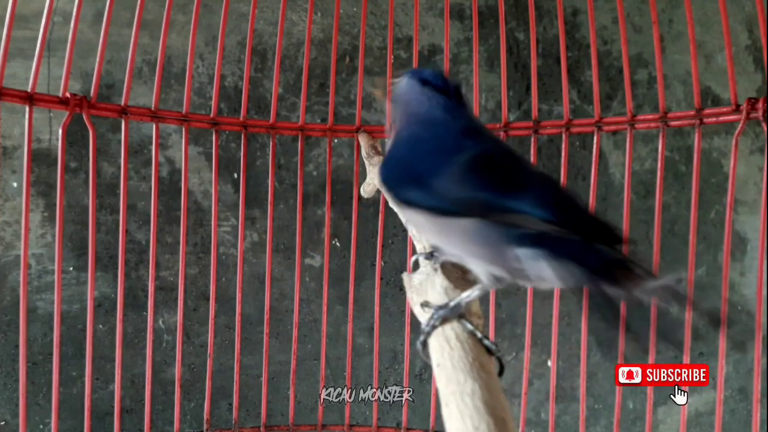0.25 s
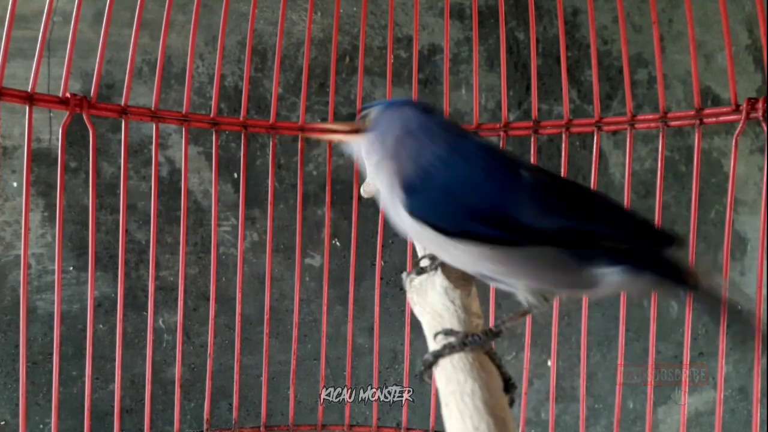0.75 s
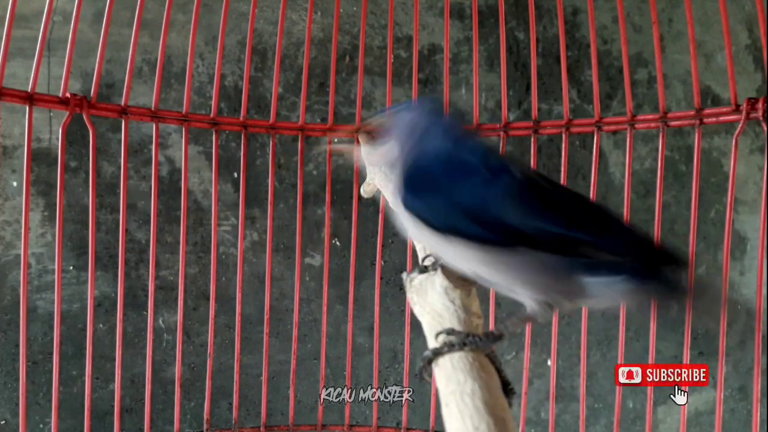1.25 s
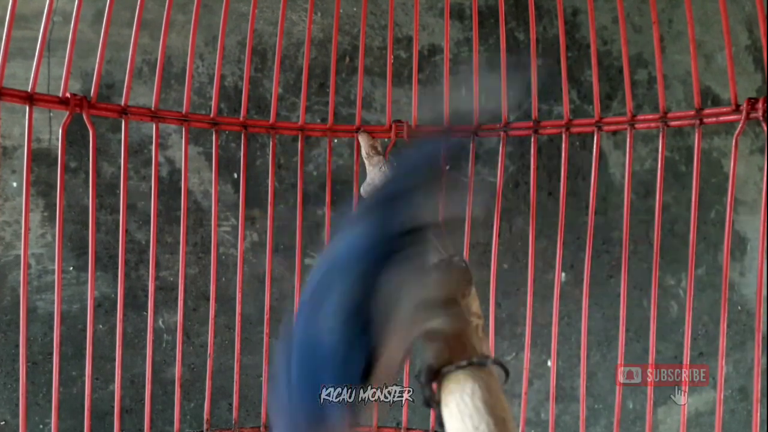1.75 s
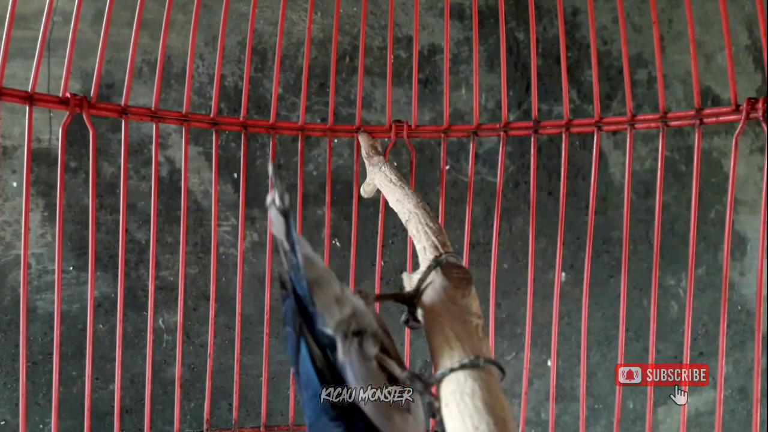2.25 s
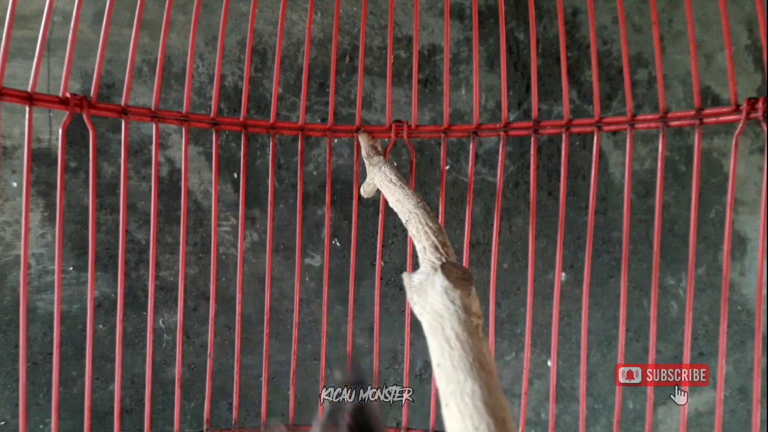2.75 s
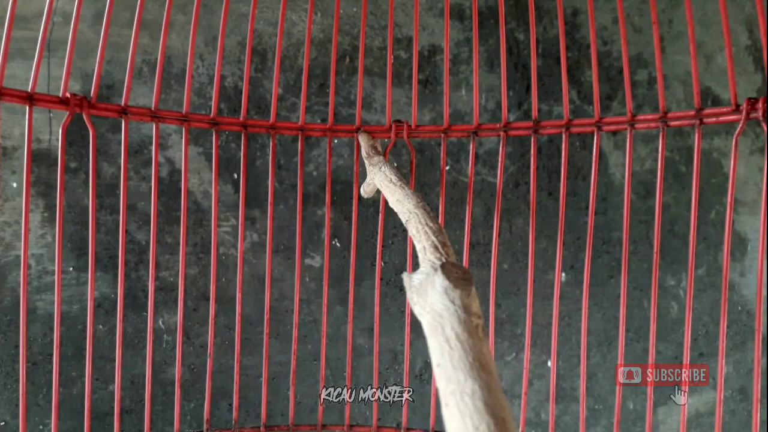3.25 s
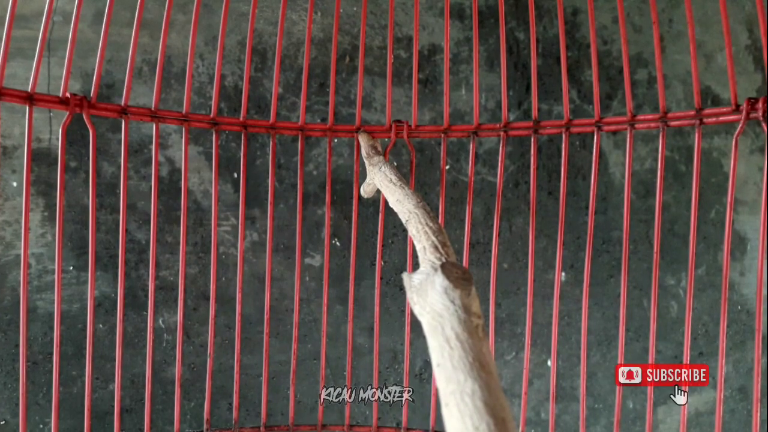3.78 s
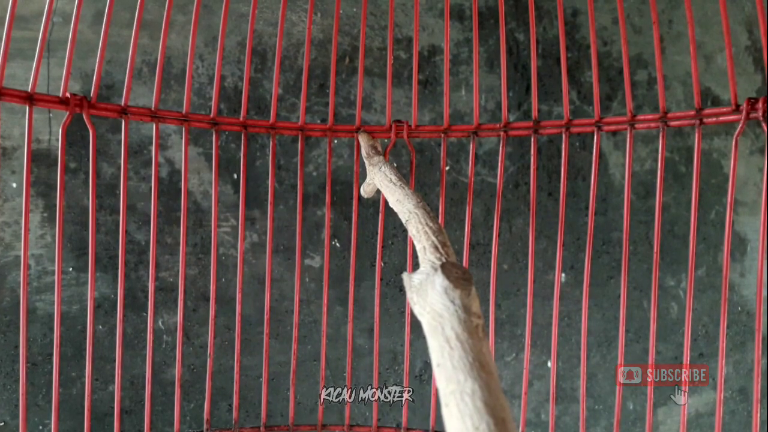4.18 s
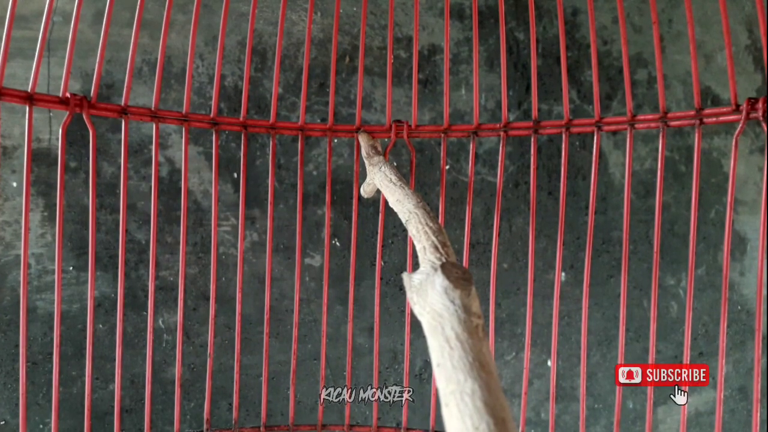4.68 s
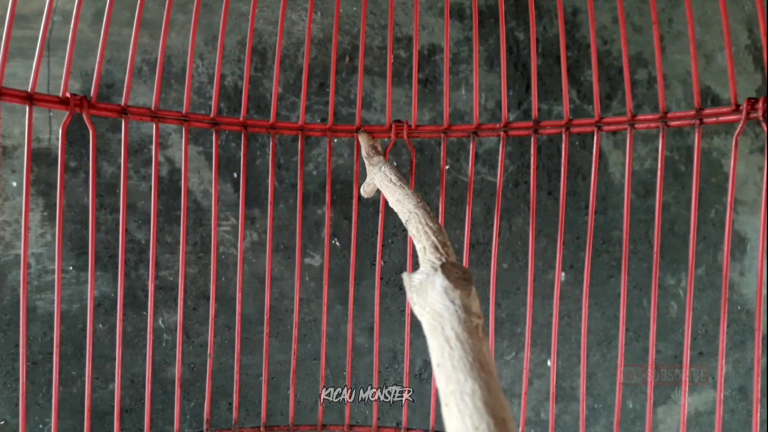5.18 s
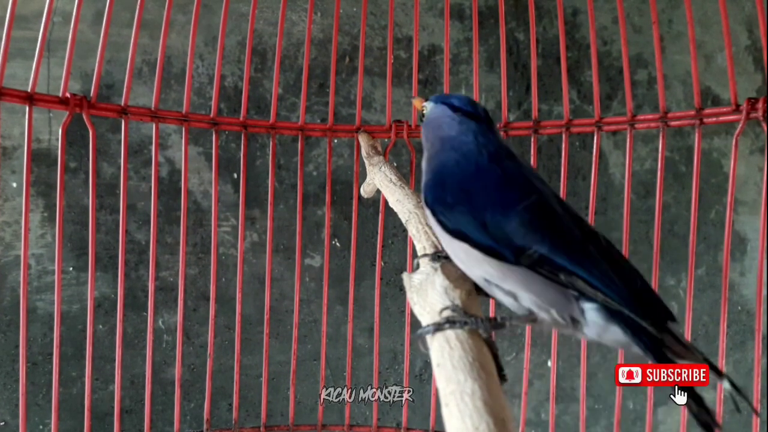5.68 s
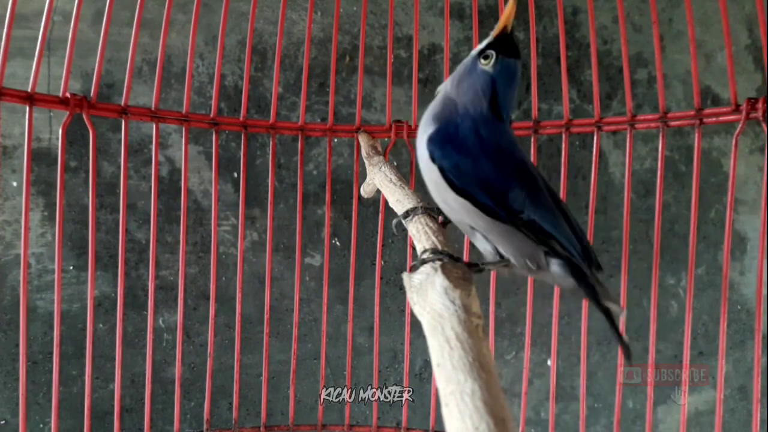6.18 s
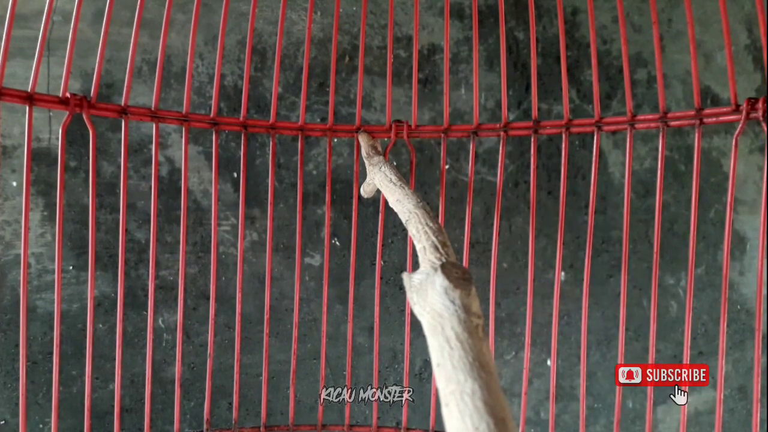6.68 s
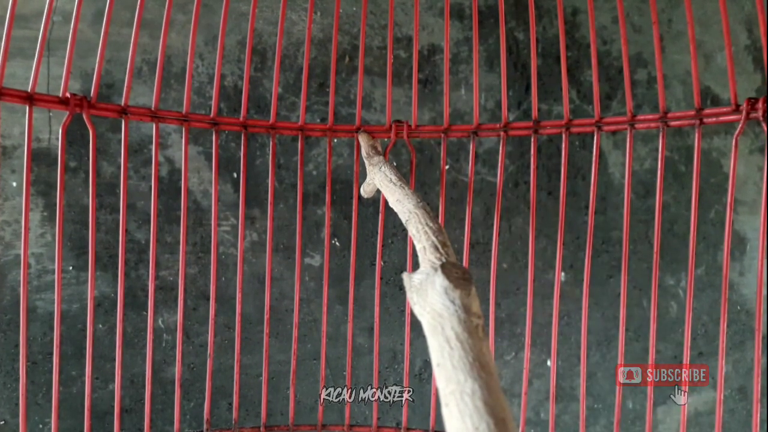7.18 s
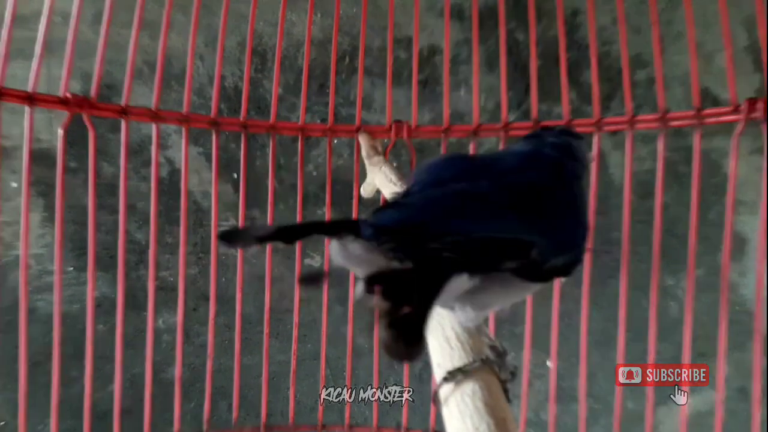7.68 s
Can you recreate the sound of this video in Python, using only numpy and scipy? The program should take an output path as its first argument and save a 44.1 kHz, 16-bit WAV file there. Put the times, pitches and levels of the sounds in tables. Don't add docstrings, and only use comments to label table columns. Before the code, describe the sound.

A small caged songbird gives piercing, very short whistled chips in quick groups, with claw ticks on wire, far birds and passing engines outside.

```python
import sys
import numpy as np
from scipy import signal
from scipy.fft import rfft, irfft, next_fast_len
from scipy.io import wavfile
from scipy.ndimage import uniform_filter1d

SR = 44100
rng = np.random.default_rng(int(sys.argv[2]) if len(sys.argv) > 2 else 0)


def amp(db):
    return 10 ** (np.asarray(db, float) / 20)


def write(x):
    x = np.atleast_2d(x).T
    wavfile.write(sys.argv[1], SR, np.round(np.clip(x, -1, 1) * 32767).astype(np.int16))


N = 349713


def curve(table):
    s, *columns = np.transpose(table)
    return [np.interp(np.arange(N) / SR, s, c) for c in columns]


def band(x, hz, width):
    return signal.lfilter(*signal.iirpeak(hz, hz / width, fs=SR), x)


def colour(x, points):
    f, db = np.transpose(points)
    size = next_fast_len(N)
    hz = np.maximum(np.arange(size // 2 + 1) * SR / size, 1)
    gain = amp(np.interp(np.log(hz), np.log(f), db))
    return irfft(rfft(x, size) * gain, size)[..., :N]


def walk(rate):
    k = int(SR / rate)
    held = np.repeat(rng.standard_normal(N // k + 1), k)
    return 1.5 * uniform_filter1d(uniform_filter1d(held, k), k)[:N]


def echo(x, t60, late_t60, late_db, grain_db, gap_ms):
    t = np.arange(SR) / SR
    taps = rng.standard_normal((2, SR)) * amp(grain_db * rng.exponential(size=(2, SR)))
    taps *= (amp(-60 * t / t60) + amp(late_db - 60 * t / late_t60)) * (t > gap_ms / 1000)
    taps /= np.sqrt(np.sum(taps ** 2, axis=1, keepdims=True))
    return signal.fftconvolve(x[None], taps, axes=1)[:, :N]


WAVER = walk(120)


def whistle(rows, partials, attack=.15, tail=0.22, waver=0., grow_db=0.):
    out = np.zeros(N + SR)
    for s, ms, from_hz, to_hz, bend, db in rows:
        n = ms * SR / 1000
        u = np.arange(-int(attack * n), int((1 + tail) * n)) / n
        glide = np.expm1(-(bend + 0.0012) * u) / np.expm1(-bend - 1e-3)
        hz = from_hz + (to_hz - from_hz) * glide
        swell = np.sin(np.pi / 2 * np.clip((u + attack) / (2 * attack), 0, 1)) ** 2
        fade = np.sin(np.pi / 2 * np.clip((1 + tail - u) / (2 * tail), 0, 1)) ** 2
        at = int((s + .5) * SR) - int(attack * n) + np.arange(len(u))
        wavering_hz = np.clip(hz, 500, 11000) * (1 + waver * WAVER[at % N])
        phase = 2 * np.pi * np.cumsum(wavering_hz) / SR
        tone = np.sin(phase)
        for k, p_db in partials:
            tone = tone + amp(p_db) * np.sin(k * phase) * (k * hz < SR / 2.5)
        growth = amp(db + grow_db * (u - (grow_db > 0)))
        out[at] += growth * swell * fade * tone
    return out[SR // 2:SR // 2 + N]


# multiple, level/dB
FAINT_PARTIAL = [(1.2, -21)]


def forceful(rows, attack, tail, grow_db):
    return whistle(rows, FAINT_PARTIAL, attack=attack, tail=tail, grow_db=grow_db)


# fall t/s, rise start f/Hz, rise level/dB, snap level/dB, fall level/dB
CHIPS = [(0.0252, 6300, -12, -15, -11), (0.3008, 5900, -16.5, -13.5, -10), (.431, 5300, -8.5, -11.5, -8),
         (0.763, 6060, -12.5, -16, -10), (0.9, 5300, -21, -14.5, -13.5), (1.3005, 6050, -18, -15.5, -9.5),
         (1.436, 5300, -11.5, -13.5, -10), (1.886, 5716, -12, -17, -10), (2.0239, 5330, -14.5, -13, -10.5),
         (3.094, 6290, -14.5, -17.5, -15), (3.216, 5377, -16.5, -11, -17),
         (3.3527, 5633, -22.5, -16.5, -13.5)]
# multiple, level/dB
RISE_PARTIALS = [(2, -11)]


def chips():
    rise_ends_s, rise_gain_hz = .021, 800
    plunge_ms, fall_from_hz = 5, 6900
    rises, turns, snaps, flicks, plunges, falls = [], [], [], [], [], []
    for s, hz, rise_db, snap_db, fall_db in CHIPS:
        ms = 12.5 + 2.8 * (6000 - hz) / 1000
        top_hz = hz + rise_gain_hz
        rises.append((s - rise_ends_s - ms / 1000, ms, hz, top_hz, .8, rise_db))
        turns.append((s - rise_ends_s, 5.2, top_hz, top_hz - 1600, -1.2, rise_db - 9.5))
        snaps.append((s - .0185, 8.5, 9100, 4000, 1.9, snap_db))
        flicks.append((s - .0085, 6.5, 5200, 8900, -.3, fall_db - 6.5))
        plunges.append((s, plunge_ms, 9000, fall_from_hz, .6, fall_db + 1))
        falls.append((s + plunge_ms / 1000, 19, fall_from_hz, 3356, 0.54, fall_db))
    smooth = whistle(rises, RISE_PARTIALS, attack=0.27, tail=0.09, grow_db=5.5)
    smooth = smooth + whistle(turns + flicks, [], attack=.2)
    harsh = forceful(plunges + falls, attack=0.12, tail=0.49, grow_db=-8.5)
    harsh = harsh + forceful(snaps, attack=0.14, tail=0.43, grow_db=-2)
    return smooth, harsh


# drop t/s, climb start f/Hz, peak f/Hz, climb level/dB, drop level/dB
PAIRS = [
    (4.197, 6010, 8500, -22, -12),
    (4.488, 5650, 7710, -15, -7.5),
    (5.068, 5460, 9020, -11.5, -9),
    (5.647, 5900, 8550, -15.5, -11),
    (6.59, 5700, 8880, -7.5, -11),
    (7.344, 6350, 8770, -14, -12.5),
    (7.867, 5620, 7670, -12, -13.5),
]
# multiple, level/dB
CLIMB_PARTIALS = [(.5, -11), (1.5, -16), (2, -23.5)]


def pairs():
    scoop_ms = 6.8
    climbs, lows, drops = [], [], []
    for s, hz, peak_hz, climb_db, drop_db in PAIRS:
        start = s - .018
        scoop_gain_db = min(-20 + 26 * (hz - 5400) / 1000, 0)
        scoop_db = climb_db + scoop_gain_db
        delay_ms = scoop_ms * amp(scoop_gain_db)
        climbs.append((start + delay_ms / 1000, 16 - delay_ms, hz, peak_hz, -3.5, climb_db))
        climbs.append((start - .001, scoop_ms, hz + 1400, hz, 1.2, scoop_db))
        lows.append((s - .008, 9, 3300, peak_hz / 2, 3.0, drop_db - 9.5))
        drop_ms = 11 + 4 * (8900 - peak_hz) / 1000
        drops.append((s, drop_ms, peak_hz, 3883, .9, drop_db))
    smooth = whistle(climbs, CLIMB_PARTIALS, attack=.25, tail=0.12, grow_db=2.0)
    smooth = smooth + whistle(lows, [], attack=.2)
    return smooth, forceful(drops, attack=0.093, tail=0.22, grow_db=-1.5)


# t/s, level/dB, bend
HOOKS = [
    (4.231, -9.5, -0.8),
    (4.524, -8, -1.5),
    (5.103, -13.5, -1),
    (5.684, -11.5, -0.2),
    (6.624, -11, -3),
    (7.378, -13, -1.5),
    (7.905, -13.5, -0.4),
]


def hooks():
    leads = [(s - .007, 8.0, 3500, 3400, 1.5, db - 15) for s, db, bend in HOOKS]
    falls = [(s, 17, 6900, 3300, bend, db) for s, db, bend in HOOKS]
    return whistle(leads, [], attack=.2), forceful(falls, attack=.15, tail=0.28, grow_db=-3)


# t/s, left minus right level/dB, echo share level/dB
FACING = [(0.014, 4.5, -8), (0.294, 6, -5), (0.422, 4.5, -9), (0.757, 8.5, -9.5), (0.892, 0, -1.5),
          (1.35, 7.5, -11), (1.876, 6.5, -5.5), (2.015, 6.5, -7.5), (3.085, 2.5, 1.5), (3.21, 1.9, 2.5),
          (3.345, 4.5, -2.5), (4.202, -2.5, -3.5), (4.495, -1, -7), (5.075, 6.5, -12.5), (5.655, 0.5, -7),
          (6.596, -2, -12), (7.352, 4, -6.5), (7.88, 4.5, -11.5)]
# f/Hz, width f/Hz, level/dB
THROAT = [(4060, 4600, -10.5), (6270, 2000, 5.5), (9290, 1400, 4.5), (13700, 15000, -6.5)]
# f/Hz, level/dB per Hz
NOISE_COLOUR = [(300, -35), (1000, -38), (2500, -30.5), (4000, -20.5), (6200, -14.5), (8800, -19), (9700, -29.5),
                (11000, -23.5), (15500, -28.5)]


def bird():
    smooth, harsh = sum(np.array(call) for call in (chips(), pairs(), hooks()))
    voice = 0
    for k, (f, width, db) in enumerate(THROAT):
        voice = voice + (-1) ** k * amp(db) * band(smooth + harsh, f, width)
    voice = amp(-1.5) * voice * amp(1.8 * walk(500))
    voice = voice + amp(-20.5) * np.roll(voice, int(.0115 * SR))
    pan_db, wet_db = curve(FACING)
    power = uniform_filter1d(harsh ** 2 + amp(-17.5) * smooth ** 2, int(.009 * SR))
    effort = np.sqrt(np.abs(power))
    noise = amp(17.5) * colour(rng.standard_normal((2, N)), NOISE_COLOUR) * effort
    lagging = np.interp(np.arange(N) - 12.5, np.arange(N), voice)
    sent = (voice + noise[0]) * amp(wet_db + 1.0)
    wet = echo(sent, t60=0.082, late_t60=0.33, late_db=-21.5, grain_db=5, gap_ms=0.17)
    return (np.array([voice, lagging]) + noise + wet) * amp(np.array([pan_db, -pan_db]) / 2)


# t/s, level/dB
SEEPS = [(2.69, -67.5), (3.438, -57.5), (3.625, -52), (3.808, -49.5), (3.988, -49.5), (6.296, -53.5),
         (6.381, -48.5), (6.82, -53), (7.009, -52.5), (7.2, -52), (7.67, -60)]
# t/s, level/dB
WHOOPS = [
    (1.308, -48),
    (1.543, -44.5),
    (1.779, -41.5),
    (2.019, -49.5),
]
# t/s, length/ms, f/Hz, level/dB
PIPS = [
    (.57, 40, 6350, -64),
    (.945, 140, 2330, -60.5),
    (.945, 90, 2980, -53.5),
    (.945, 69, 3520, -56),
    (1.095, 35, 6290, -66.5),
    (1.109, 25, 5700, -70.5),
]
# t/s, length/ms, start f/Hz, sag f/Hz, level/dB
SQUAWKS = [(.673, 25, 4240, -100, -57), (.669, 30, 4960, 5, -62), (2.744, 60, 4420, 273, -62.5),
           (2.983, 60, 7000, 1000, -57), (5.269, 200, 4080, -150, -64.5), (6.113, 100, 7030, 1127, -59),
           (6.13, 80, 4830, 653, -60), (7.06, 37, 3720, 71, -50.5), (7.12, 87, 5000, 497, -43),
           (7.149, 70, 4285, 399, -43), (7.131, 50, 2870, 581, -55), (7.247, 54, 3566, 767, -39.5),
           (7.251, 20, 2884, 598, -43), (7.261, 55, 2145, 29.5, -43.5)]


def far_birds():
    grunt_ms = 30
    clear = [(s, 38, 6800, 5450, -1.5, db) for s, db in SEEPS]
    clear += [(s, 50, 1810, 2770, -.5, db) for s, db in WHOOPS]
    clear += [(s - grunt_ms / 1000, grunt_ms, 1650, 1650, 1, db - 12.5) for s, db in WHOOPS]
    clear += [(s, ms, hz, hz, 1, db) for s, ms, hz, db in PIPS]
    hoarse = [(s, ms, hz, hz - sag, 1.3, db) for s, ms, hz, sag, db in SQUAWKS]
    croak = walk(600)
    voice = whistle(clear, [], waver=0.014) + whistle(hoarse, [], waver=0.041) * croak
    direct = amp(-10) * voice * np.array([[1], [-.6]])
    return direct + amp(8.5) * echo(voice, t60=0.15, late_t60=0.71, late_db=-15.5, grain_db=2, gap_ms=1.9)


# t/s, peak level/dB, ring t60 scale
TICKS = [(2.5102, -58.5, 0.4), (2.5254, -71.5, 0.2), (2.5563, -54.5, 0.2), (2.597, -52.5, 0.27),
         (2.8444, -44.5, 0.33), (2.8769, -44, 0.13), (4.0926, -52, 0.43), (4.596, -44, 0.25),
         (4.6503, -32, 0.19), (4.6644, -47.5, 0.21), (4.7386, -33, 0.16), (4.801, -30.5, 0.15),
         (4.8124, -34, 0.15), (4.841, -28.5, 0.26), (4.8489, -32, 0.22), (4.8863, -41, 0.31),
         (5.4422, -50, 0.26), (5.455, -41.5, 0.21), (5.5067, -36.5, 0.3), (5.9584, -49, 0.48),
         (6.4517, -29, 0.6), (6.4847, -33, 0.92), (7.5213, -44.5, 0.72), (7.5956, -38.5, 0.12)]
# f/Hz, level/dB, t60/s
WIRES = [(3666, -5, .25), (5141, -5, .3), (8204, -11, .2), (8753, -4, .35), (8920, -7, .2), (9663, -13, .2),
         (10900, -12, .25), (13400, -12, .25), (1500, -7, .2), (2250, -7, .2)]


def cage():
    out, t = np.zeros(N + SR), np.arange(SR // 3) / SR
    chance = rng.standard_normal((len(TICKS), len(WIRES)))
    for (s, db, ring), luck in zip(TICKS, chance):
        ring = max(ring, .05)
        modes = 0
        for (f, m_db, t60), c in zip(WIRES, luck):
            decay = amp(m_db + 5.4 * c - 60 * t / (t60 * ring))
            modes = modes + decay * np.sin(2 * np.pi * f * (1 + 0.0012 * c) * t + c)
        quick = amp(-60 * t / .022)
        rattle = amp(-4 - 60 * t / (.7 * ring))
        crack = band(rng.standard_normal(len(t)), 9100, 9000) * (amp(2.5) * quick + ring * rattle)
        at = int(s * SR)
        out[at:at + len(t)] += amp(db - 3.5) * (ring * modes + crack)
    out = out[:N]
    wet = echo(out, t60=0.17, late_t60=.4, late_db=-26.0, grain_db=2.5, gap_ms=0.9)
    return out * np.array([[1], [.7]]) + amp(-3.5) * wet


def engine(table, orders, wobble_db, drift):
    hz, db = curve(table)
    t = np.arange(N) / SR
    seen = np.clip(np.minimum(t - table[0][0], table[-1][0] - t) / 0.097, 0, 1)
    phase = 2 * np.pi * np.cumsum(hz * (1 + drift * walk(9.9))) / SR
    drone = sum(amp(o_db + wobble_db * walk(14)) * np.sin(k * phase + k * k) for k, o_db in orders)
    return seen * amp(db + 2.5) * drone


# t/s, level/dB
SLOWING = [
    (4.129, -43),
    (4.22, -29.5),
    (4.5, -29),
    (4.65, -36),
    (5.0, -30.5),
    (5.13, -44),
    (5.7, -34),
    (6.5, -39),
    (6.7, -51),
    (7.39, -46),
]
# multiple, level/dB
SLOWING_ORDERS = [(1, -35), (2, -25.5), (3, -10.5), (4, -3), (5, -8.5), (6, -25.5), (7, -29.5), (8, -21.5)]


def slowing_engine():
    start = SLOWING[0][0]
    table = [(s, 55.0 - 4.3 * (s - start), db) for s, db in SLOWING]
    return engine(table, SLOWING_ORDERS, wobble_db=4.5, drift=0.01643)


# t/s, firing f/Hz, level/dB
STEADY = [
    (4.13, 65.06, -62),
    (4.3, 64.58, -37.5),
    (5.05, 66.24, -39),
    (5.2, 70.27, -39),
    (5.5, 70.4, -30.5),
    (5.72, 70.73, -49),
    (6, 71.7, -37),
    (6.95, 69.96, -45.5),
    (7.39, 69.9, -51),
]
# multiple, level/dB
STEADY_ORDERS = [(1, -14), (2, -0.5), (3, -10.5), (4, -16.5), (5, -33), (6, -25)]


def steady_engine():
    return engine(STEADY, STEADY_ORDERS, wobble_db=2.5, drift=0.01583)


# t/s, level/dB
YARD = [(0, -1), (.6, -16), (1.15, -15), (1.9, -7), (2.49, -17), (2.52, -1.5), (3, -4), (3.6, -10.5),
        (4.1, 0.5), (4.16, 9.5), (5.55, 6), (5.9, 0), (6.63, 5), (6.67, -3.5), (7.37, 4), (7.4, -11),
        (7.59, 0), (7.62, 2.5)]
# f/Hz, level/dB per Hz
YARD_COLOUR = [(25, -34.5), (60, -6.5), (120, -6.5), (250, -11), (433, -23.5), (614, -19), (850, -26),
               (1260, -26), (1500, -32.5), (2100, -28.5), (3090, -40), (7500, -37.5), (9000, -40.5),
               (10000, -51.5), (15500, -57.5)]
# start t/s, end t/s, centre f/Hz, level/dB
SWISHES = [
    (4.497, 5.101, 72, -49.5),
    (2.556, 2.959, 1322, -60.5),
    (6.43, 6.608, 3500, -49),
    (7.1, 7.382, 4500, -57),
    (7.114, 7.303, 13000, -51),
    (7.517, 7.706, 5840, -56.5),
    (7.572, 7.931, 1590, -58),
]


def yard():
    out, gain_db, t = 0, curve(YARD)[0], np.arange(N) / SR
    lasting = np.array([np.clip(np.minimum(t - a, b - t) / 0.019, 0, 1) for a, b, *_ in SWISHES])
    for hz in 28 * 2 ** np.arange(0, 9.1, 1 / 3):
        mid, side = (band(rng.standard_normal(N), hz, hz / 4) for _ in range(2))
        share = np.interp(np.log(hz), np.log([150, 500, 2200, 3500]), [0.5, 1.11, 1.11, .75])
        reach = [amp(db + 61) * np.exp(-np.log2(hz / centre_hz) ** 2) for *_, centre_hz, db in SWISHES]
        level = amp(share * gain_db) + reach @ lasting
        patchy_db = 3.3 * walk(11) + 2.8 * walk(2.5)
        spread = np.clip(hz / 500., .35, 1.2) * side * np.array([[1], [-1]])
        out = out + level * amp(patchy_db) * (mid + spread)
    return amp(-26.5) * colour(out, YARD_COLOUR)


def scene():
    one, two = slowing_engine(), steady_engine()
    left = one + 0.89 * np.roll(two, 22)
    right = np.roll(one, 18) + 1.1 * two
    return bird() + far_birds() + cage() + np.array([left, right]) + yard()


def top_cut(x):
    return signal.sosfilt(signal.butter(12, 15820, fs=SR, output="sos"), x)


def record(dry):
    limited = np.clip(dry + .025 * dry ** 2, -.88, .88)
    low_pass = signal.ellip(10, .2, 70, 15750, fs=SR, output="sos")
    return top_cut(signal.sosfilt(low_pass, limited))


dry = scene()
out = record(dry)
write(out)
```